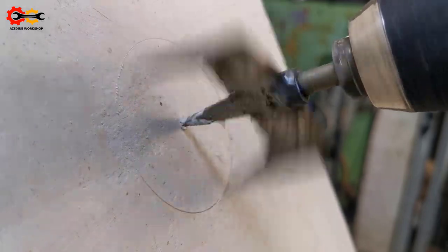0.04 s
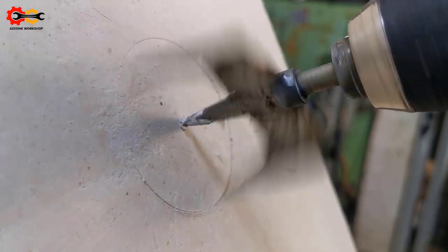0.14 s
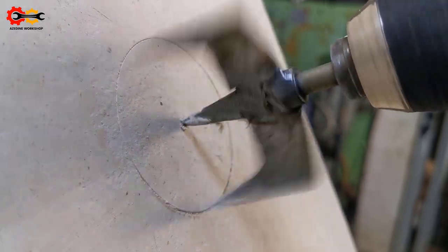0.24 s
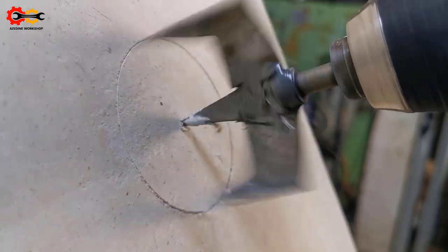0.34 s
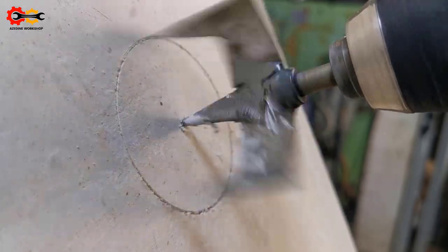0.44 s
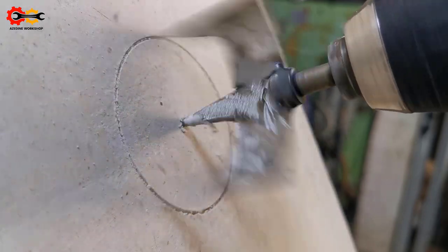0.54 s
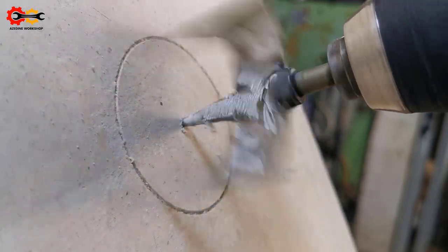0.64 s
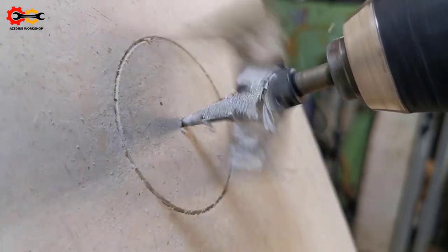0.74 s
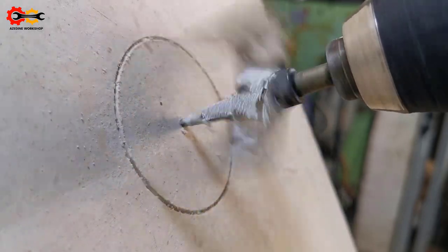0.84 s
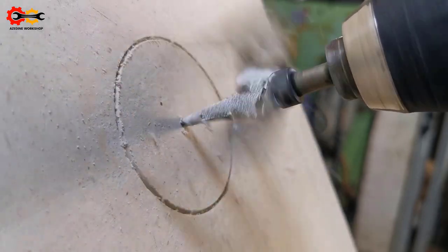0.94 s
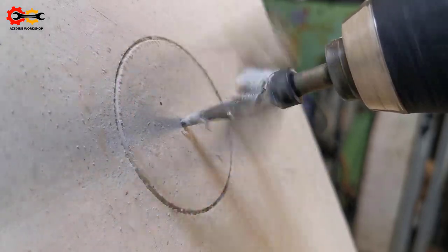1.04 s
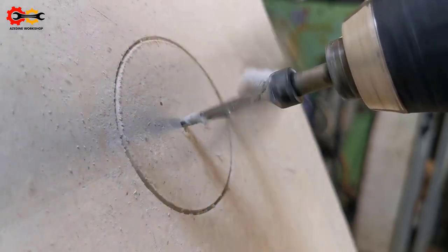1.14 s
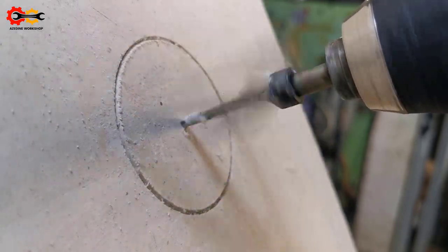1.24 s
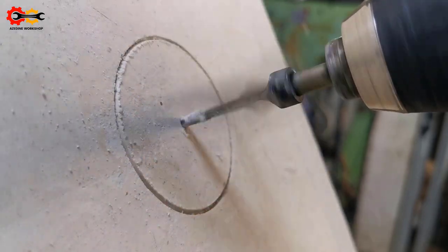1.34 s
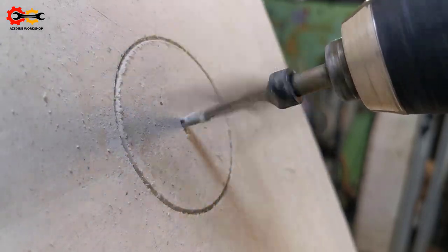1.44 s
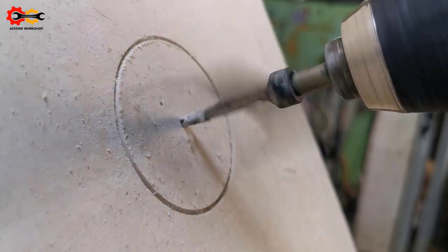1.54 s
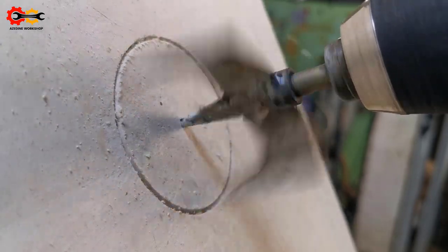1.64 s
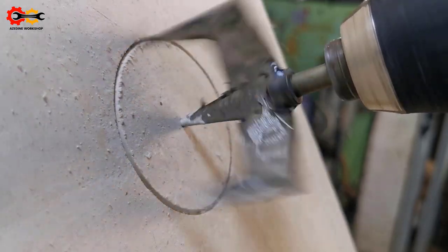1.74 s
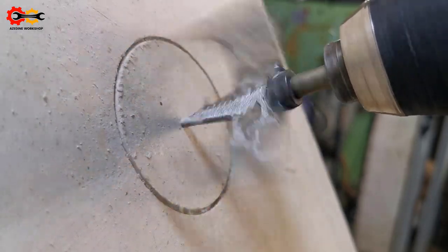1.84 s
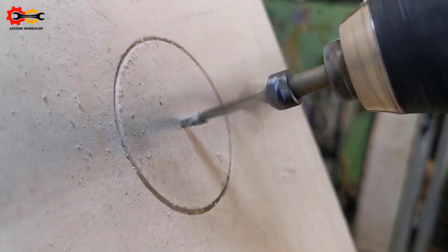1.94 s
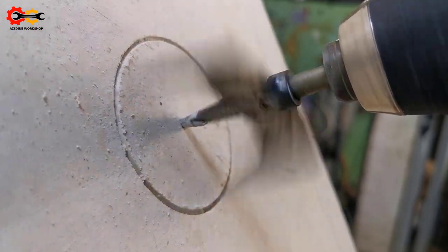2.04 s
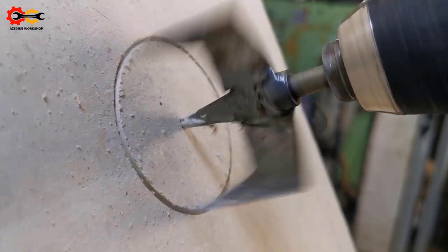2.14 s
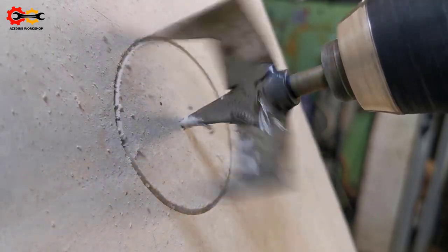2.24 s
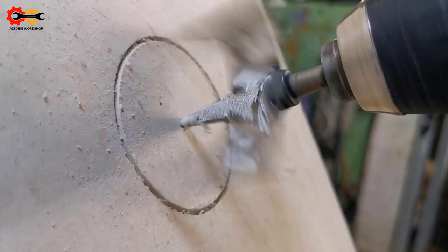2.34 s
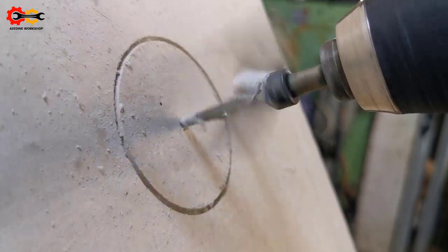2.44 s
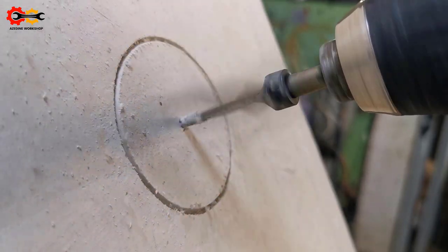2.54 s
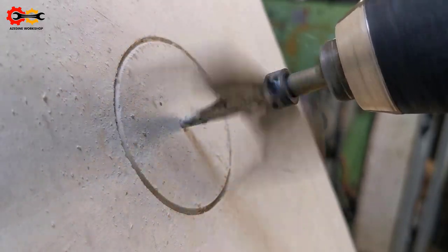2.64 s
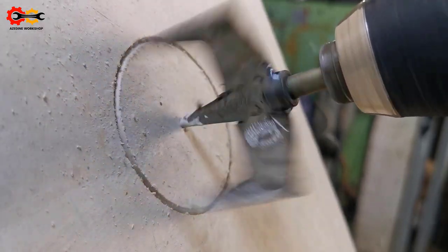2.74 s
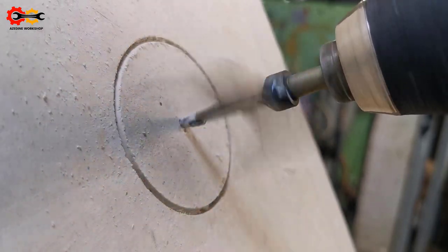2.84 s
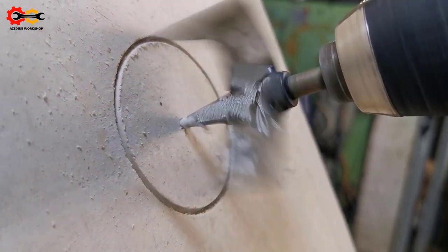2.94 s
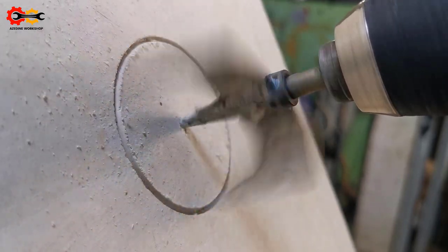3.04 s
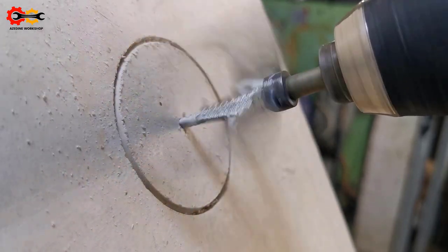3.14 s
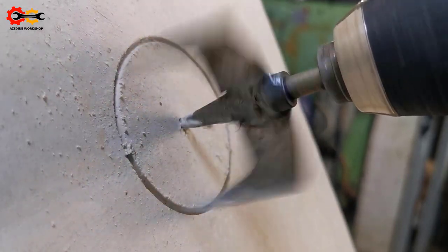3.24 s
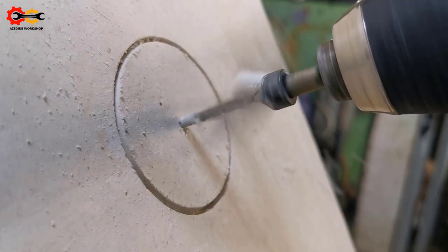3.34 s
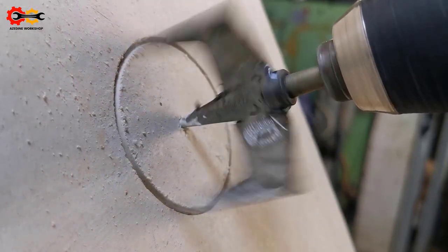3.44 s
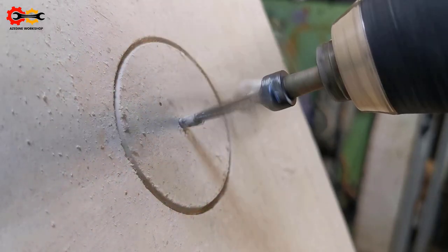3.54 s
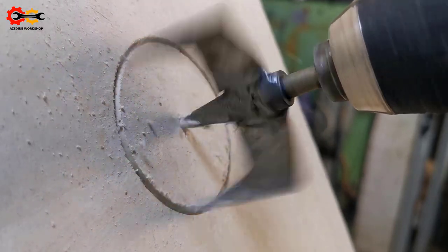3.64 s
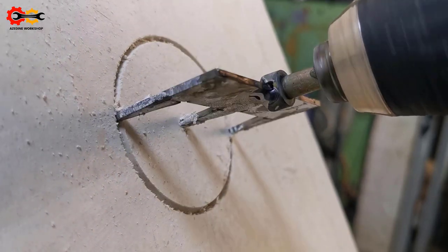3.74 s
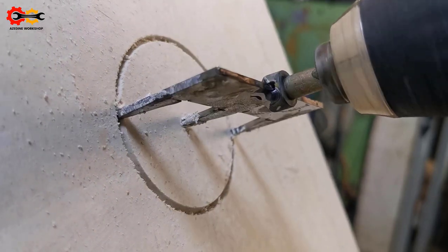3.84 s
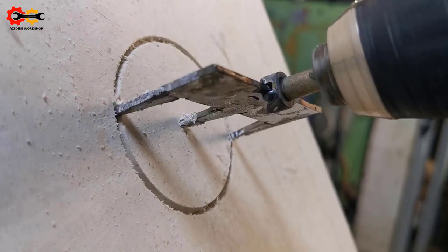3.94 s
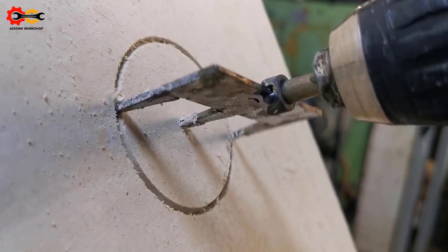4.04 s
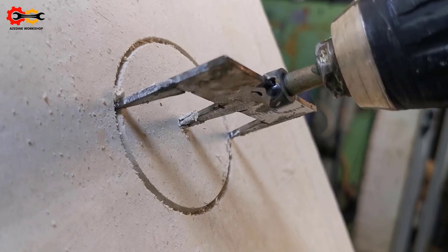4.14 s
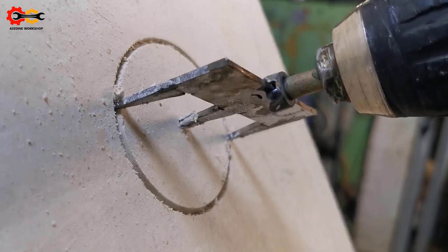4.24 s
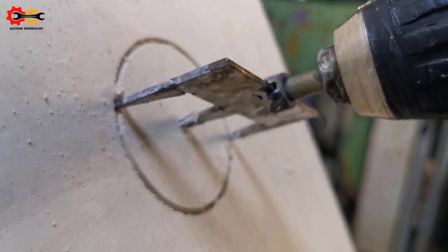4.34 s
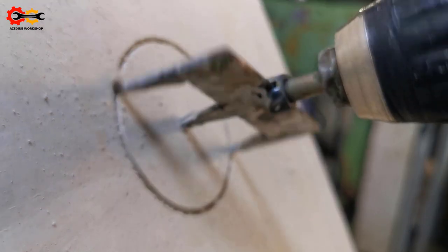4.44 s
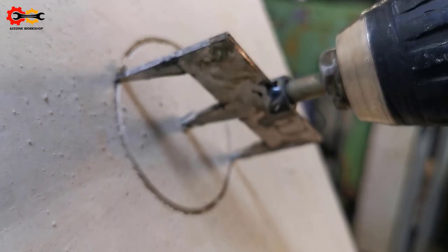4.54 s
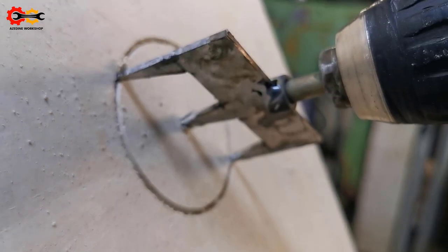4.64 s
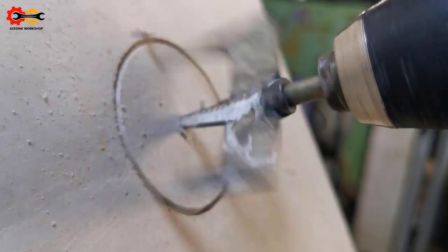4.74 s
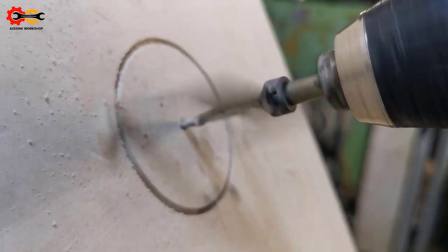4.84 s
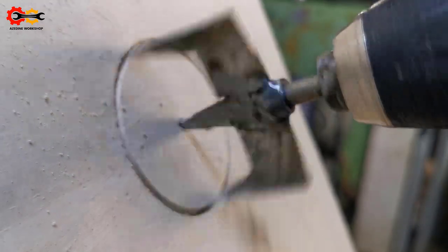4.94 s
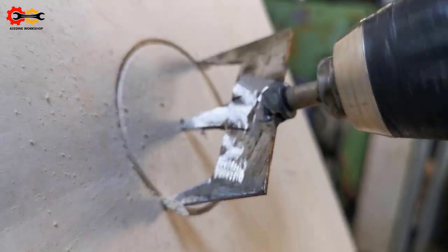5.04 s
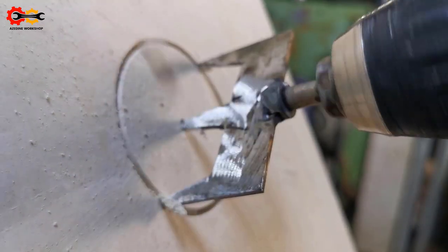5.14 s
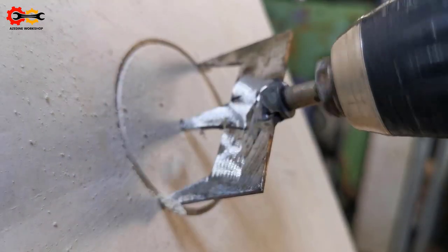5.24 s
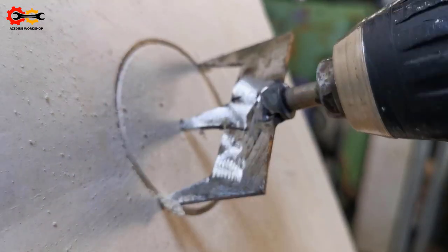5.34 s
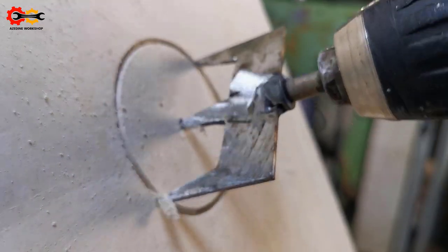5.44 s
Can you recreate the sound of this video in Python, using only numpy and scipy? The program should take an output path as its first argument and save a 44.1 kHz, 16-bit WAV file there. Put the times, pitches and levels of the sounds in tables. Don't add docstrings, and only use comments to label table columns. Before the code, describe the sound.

Close and dry, mostly on the right: a drill's gears whine, rising in steps, while metal prongs tear wood in a gritty pulsing rasp. A fixed high motor tone sings throughout. Near four seconds the pitch falls and a very high squeal breaks out. Clicks and a short near-quiet follow, then a hard click, a motor hum, another burst of grinding and a weaker squeal as the drill bogs down. Faint low workshop rumble lies underneath.

```python
import sys
import numpy as np
from scipy import signal
from scipy.fft import rfft, irfft, next_fast_len
from scipy.io import wavfile
from scipy.ndimage import uniform_filter1d

SR = 44100
rng = np.random.default_rng(int(sys.argv[2]) if len(sys.argv) > 2 else 0)


def boost_factor(decibels):
    exponent = np.asarray(decibels, float) / 20
    return 10 ** exponent


def log_audio(samples):
    frames = np.atleast_2d(samples).T
    limited = np.clip(frames, -1, 1)
    pcm = np.round(limited * 32767).astype(np.int16)
    wavfile.write(sys.argv[1], SR, pcm)


N = 242550
SIZE = next_fast_len(N + SR)
HZ = np.maximum(np.arange(SIZE // 2 + 1) * SR / SIZE, 1)
TIME = np.arange(N) / SR
LEFT_LAG = 17
FULL_SAG_HZ = 30


def in_time(tables):
    s, *columns = np.concatenate([np.array(rows, float) for rows in tables]).T
    s = s + 1e-6 * np.arange(len(s))
    return [np.interp(TIME, s, c) for c in columns]


def sounding(spans):
    inside = sum((TIME >= a) & (TIME <= b) for a, b in spans) * 1.
    return uniform_filter1d(inside, size=300)


def at_hz(points, hz):
    point_hz, point_db = np.array(points).T[:2]
    return np.interp(np.log(hz), np.log(point_hz), point_db)


def rms_one(x):
    return x / np.sqrt(np.mean(x ** 2) + 1e-20)


def drift(rate):
    r = np.exp(-80 * np.pi * rate / SR)
    slow = signal.lfilter([1], [1, -2 * r, r * r], rng.standard_normal(N // 40 + 2002))[2000:]
    return np.interp(np.arange(N) / 40, np.arange(len(slow)), rms_one(slow))


def coloured(spectrum):
    bins = rfft(rng.standard_normal(SIZE)) * boost_factor(at_hz(spectrum, HZ))
    return rms_one(irfft(bins)[:N])


def ring(blows, hz, t60):
    r, w = boost_factor(-60 / (t60 * SR)), 2 * np.pi * hz / SR
    return signal.lfilter([0, np.sin(w)], [1, -2 * r * np.cos(w), r * r], blows + 1e-18)


def chuck():
    # time in seconds, rate at which gear teeth meet in Hz, sag once a chuck turn in Hz.
    speed = [(0, 1303, 5), (.068, 1283, 0), (.12, 1156, 0), (.189, 1125, 10), (.26, 1440, 15),
             (.42, 1491, 3), (.87, 1424, 3), (1.67, 1432, 24), (1.784, 1575, 40), (2.17, 1551, 34),
             (2.79, 1486, 33), (2.966, 1829, 28), (3.74, 1758, 24), (3.826, 1625, 0), (3.897, 1216, 0),
             (4.121, 1186, 0), (4.143, 1420, 0), (4.17, 1231, 0)]
    restart = [
        (5.06, 1780, 0),
        (5.078, 1750, 0),
        (5.172, 1215, 0),
    ]
    meshes_per_turn, start_rad = 281.5, 2.84
    mean_hz, sag_hz = in_time([speed, restart])
    return mean_hz, sag_hz, start_rad + 2 * np.pi * np.cumsum(mean_hz) / SR / meshes_per_turn


def cutting():
    # time in seconds, level in dB.
    bite = [(0, -33.5), (.045, -40), (.094, -33), (.17, -35.5), (.23, -33), (.6, -32), (1.3, -32),
            (1.6, -30.5), (2.0, -32), (2.4, -31), (2.8, -32.5), (3.2, -29.5), (3.5, -30.5), (3.82, -29),
            (3.9, -33), (3.986, -40), (4.164, -40.5), (4.204, -54.5)]
    # time in seconds, level in dB.
    coast = [
        (4.22, -59),
        (4.256, -86),
        (4.278, -41),
        (4.29, -57.5),
        (4.42, -92),
    ]
    # time in seconds, level in dB.
    bite_again = [(4.824, -68), (4.856, -43.5), (4.96, -31.5), (5.0, -36.5), (5.036, -35), (5.23, -38.5),
                  (5.252, -36), (5.286, -45.5), (5.47, -41), (5.5, -51)]
    # start in seconds, then bench, board and gearbox in dB relative to the prongs.
    stages = [
        (0, -13.5, -14.5, -4),
        (1.15, -13, -14.5, -4.5),
        (3.9, -21.5, -15, -2.5),
        (4.2, -6, -7.5, -11),
        (4.6, -7.5, -6.5, -4),
        (5.2, -14, -4.5, -4),
    ]
    # throb once a turn in dB, throb twice a turn in dB.
    throb = [
        (.8, 1.5),
        (.8, 1.4),
        (.8, 0.6),
        (.9, -0.05),
    ]
    once_lag, twice_lag = 0.15, -0.3
    (bite_db,), (_, sag_hz, angle) = in_time([bite, coast, bite_again]), chuck()
    stages = np.array(stages)
    now = np.searchsorted(stages[:, 0], TIME, "right") - 1
    _, bench, board, gearbox = stages[now].T
    shares_db = uniform_filter1d(np.array([bench, board, 0 * TIME, gearbox]), size=1500)
    throb_db = np.array(throb) @ [np.cos(angle + once_lag), np.cos(2 * angle + twice_lag)]
    return bite_db + shares_db + throb_db * sag_hz / FULL_SAG_HZ


def whine():
    # multiple of the motor speed, level in dB relative to the whine, unsteadiness in dB.
    lines_of_motor = [
        (2.78, -26, 2.0),
        (8.35, -21, 3.0),
        (9.0, 0.1, 1.5),
        (18.0, -18, 3.5),
        (27.0, -24, 3.0),
    ]
    # gear mesh rate in Hz, level in dB.
    whine_law = [(1125, -54), (1200, -37.5), (1300, -39), (1430, -32.5), (1560, -31.5), (1800, -27.5)]
    pinion_teeth = 9
    second_prong, prong_lag = .52, 1.96
    (mean_hz, sag_hz, angle), bite_db = chuck(), cutting()[2]
    again, usual = TIME > 5, bite_db - np.median(bite_db)

    mesh_hz = mean_hz + sag_hz * (np.cos(angle) + second_prong * np.cos(2 * angle + prong_lag))
    tremble_hz = np.where(again, 30, 4 + .12 * sag_hz) * (drift(30) + drift(70))
    turn = 2 * np.pi * np.cumsum(mesh_hz + tremble_hz) / pinion_teeth / SR

    level_db = np.where(again, -41.5 + 2.6 * drift(30.0), at_hz(whine_law, mean_hz) + 0.3 * usual)
    lines = sum(boost_factor(db + waver_db * drift(15.0)) * np.sin(k * turn) for k, db, waver_db in lines_of_motor)

    octaves_off = abs(np.log2(mean_hz / 1600.0))
    bars_db = -42 + 0.94 * usual - 8 * octaves_off - 9 * (TIME > 3.88)
    bars_db = np.where(again, -50, bars_db) + 7 + 3.5 * drift(25.0)
    bars = boost_factor(bars_db) * np.sin(5 * turn)
    return (lines * boost_factor(level_db + 8.5) + bars) * sounding([(0, 4.165), (5.065, 5.165)])


def grind(grain_db, patchy_db, together_db):
    grind_bands_hz = [
        230,
        500,
        3000,
        7500,
    ]
    # frequency in Hz, level in dB.
    grind_colour = [(100, -24), (220, -16), (850, -6), (1260, -7), (2400, -2), (4400, -9), (6000, -14.5),
                    (8000, -19), (10000, -17), (13000, -17.5), (14000, -23), (16000, -17.5)]
    # frequency in Hz, width in Hz, height in dB.
    body = [(157.3, 58, 5.5), (475, 200, 2.5), (2340, 39, 4.5), (2480, 37, 4), (2995, 28, -4),
            (3087, 80, 4), (5140, 780, 7.5), (6630, 630, 7.5), (8970, 1150, 4), (10580, 50, 5),
            (10920, 920, 7), (11800, 840, 5.5), (13160, 400, 8), (14600, 600, 4.5)]
    # frequency in Hz, left minus right in dB.
    shadow = [(129, 4), (689, -9.5), (1248, -5), (1593, -15.5), (2885, -7.5), (5167, -6.5), (5986, -6),
              (7622, -1.2), (9603, -3), (10594, -20), (11498, -10.5), (12101, -14.7), (14125, -7),
              (15460, -10)]
    # frequency in Hz, share that the two microphones have in common (0 to 1).
    likeness = [(150, 0.97), (400, 0.55), (1000, 0.48), (3000, 0.13), (6000, 0.28), (12000, 0.15)]

    tears = (rng.random(SIZE) < 2500 / SR) * boost_factor(grain_db * np.minimum(rng.exponential(1, SIZE), 4))
    rough = np.sqrt(1 + uniform_filter1d(tears, size=24) * 1.4)
    peaks_db = sum(db / (1 + (2 * (HZ - hz) / width) ** 2) for hz, width, db in body)
    shape = boost_factor(at_hz(grind_colour, HZ) + peaks_db)
    near, apart = rfft(rng.standard_normal((2, SIZE)) * rough) * shape

    late = np.exp(-2j * np.pi * HZ * LEFT_LAG / SR)
    alike = np.clip(at_hz(likeness, HZ), 0, 1)
    far = boost_factor(at_hz(shadow, HZ)) * (alike * near * late + np.sqrt(1 - alike ** 2) * apart)

    levels_db, together = cutting()[:, ::64], drift(42.0)
    steady_db = np.median(levels_db, axis=1, keepdims=True)
    prong_power = 2 * np.sum(abs(near[(HZ > 2000) & (HZ < 4500)]) ** 2)
    scale = boost_factor(steady_db[2]) / np.sqrt(prong_power) * SIZE

    edges = np.r_[np.geomspace(110, 1800, 11), np.geomspace(2100, 11600, 13), 13250, 16500]
    out = 0
    for low, high in zip(edges, edges[1:]):
        hz, inside = np.sqrt(low * high), (HZ >= low) & (HZ < high)
        weights = [np.interp(np.log(hz), np.log(grind_bands_hz), row) for row in np.eye(4)]
        level_db = np.repeat(weights @ (levels_db - steady_db), 64)[:N]
        flicker_db = patchy_db * drift(15.5) + together_db * together
        both = irfft(np.array([far, near]) * inside)[:, :N]
        out = out + boost_factor(level_db + flicker_db) * both
    return out * scale * boost_factor(5.0) * sounding([(0, 4.4), (4.815, 5.6)])


def rasp():
    # frequency in Hz, level in dB, time to die by 60 dB in seconds.
    prong_modes = [(594, -5, 0.037), (2298, -0.5, 0.032), (2508, -1, 0.078), (3010, -3, 0.052),
                   (3046, -1.5, 0.028), (3410, -4.5, 0.065)]
    chance = 260 * boost_factor(4.0 * drift(12.0)) / SR
    strength = boost_factor(3.7 * np.minimum(rng.exponential(1, N), 2.5))
    snaps = (rng.random(N) < chance) * strength
    dealt = rng.integers(0, len(prong_modes), N)
    rings = sum(boost_factor(db) * ring(snaps * (dealt == k), hz, t60) for k, (hz, db, t60) in enumerate(prong_modes))
    return rms_one(rings) * boost_factor(cutting()[2] - 7.0)


def chopper():
    # time in seconds, level of the tone in dB.
    chopper_levels = [
        [(0, -52), (.34, -42), (2.7, -40), (3.05, -38), (3.84, -38.5), (4.15, -49)],
        [(4.59, -45), (4.88, -40), (4.92, -36), (5.25, -37), (5.3, -44.5), (5.4, -38.5), (5.5, -41.5)],
    ]
    # time in seconds, level of the overtones in dB.
    overtone = [(0, -64), (4.2, -68), (4.6, -67), (4.65, -51.5), (4.85, -56), (4.95, -62), (5.5, -52.5)]
    (tone_db,), (overtone_db,) = in_time(chopper_levels), in_time([overtone])
    phase = 2 * np.pi * 4883.6 * TIME

    overtone_db = overtone_db + 2.5 * drift(12) * (TIME > 4.85)
    overtones = boost_factor(overtone_db) * (np.sin(2 * phase) + boost_factor(-7.0) * np.sin(3 * phase))
    side = boost_factor(-53 + 1.5 * drift(20.0)) * np.sin(2 * np.pi * 5410 * TIME)
    side = side * sounding([(4.83, 4.895), (5.19, 5.25), (5.32, 5.42)])

    _, sag_hz, angle = chuck()
    tone_db = tone_db + 0.5 * np.cos(angle + 1) * sag_hz / FULL_SAG_HZ
    tone = boost_factor(tone_db + 1.9 * drift(20.0)) * np.sin(phase)
    return (tone + overtones + side) * boost_factor(12.0) * sounding([(0, 4.165), (4.593, 5.485)])


def workshop():
    # time in seconds, level of the rumble in dB.
    rumble_levels = [(0, -54.5), (1.4, -57.5), (2.7, -64), (3.2, -53), (3.9, -63.5), (4.4, -54.5),
                     (5.08, -51), (5.5, -69)]
    # frequency in Hz, level in dB per Hz.
    rumble_colour = [(15, -33), (25, -4), (113, -9), (133, -6.5), (162, -15.5), (317, -22), (400, -25),
                     (520, -64), (880, -120)]
    # frequency in Hz, level in dB per Hz.
    hush_colour = [(180, -25), (300, -7), (1470, -19), (2320, -17.5), (5000, -28.5), (8000, -28),
                   (10600, -27), (12000, -41)]
    level_db, = in_time([rumble_levels])
    own = np.array([coloured(rumble_colour), coloured(rumble_colour)])
    rumble = coloured(rumble_colour) + 0.58 * own
    hush = np.array([coloured(hush_colour) * boost_factor(-4.5), coloured(hush_colour)])
    return rumble * boost_factor(level_db + 1.4 * drift(3.0)) + hush * boost_factor(-65.5 + 4.0)


def squeal():
    # time in seconds, pitch in Hz, level in dB, left minus right in dB.
    squeal_path = [
        [(3.926, 12560, -33, -10), (3.94, 12480, -10.5, -10), (3.97, 12330, -35.5, 18), (4.008, 12500, -18, -4),
         (4.068, 12440, -12.5, -6), (4.105, 12440, -14.5, -7), (4.148, 12526, -8, -12),
         (4.181, 12290, -16.5, -9), (4.193, 12090, -34, -15)],
        [(5.256, 12400, -40, 4), (5.264, 12440, -24.5, 4.5), (5.316, 12350, -30, -1), (5.4, 12260, -36, 0),
         (5.418, 12284, -26.5, 6), (5.453, 12290, -20, -3), (5.46, 12520, -16, -3), (5.479, 12400, -22, 0),
         (5.5, 12360, -34, -13)],
    ]
    hz, level_db, left_db = in_time(squeal_path)
    second = TIME > 5
    tremble_hz = np.where(second, 25.0, 12.0) * drift(54.0)
    phase = 2 * np.pi * np.cumsum(hz + tremble_hz) / SR
    beat = 1 + 0.026 * np.sin(2 * np.pi * 1195 * TIME)
    tone = boost_factor(level_db + 3 + .7 * drift(40)) * beat * sounding([(3.924, 4.197), (5.252, 5.6)])
    shift = np.where(second, -2.5 + .5 * drift(14.0), .9)
    return tone * np.sin(phase), tone * np.sin(phase + shift) * boost_factor(left_db)


def crack(rows, t60, low_hz, high_hz):
    blows = np.zeros(N)
    blows[(rows[:, 0] * SR).astype(int) + 50] = boost_factor(rows[:, 1])
    fade = boost_factor(-60 * np.arange(1500) / SR / t60)
    burst = np.convolve(blows, fade)[:N] * rng.standard_normal(N)
    return signal.sosfilt(signal.butter(1, [low_hz, high_hz], "band", fs=SR, output="sos"), burst)


def clicks():
    # time in seconds, peak in dB, brightness in dB.
    click_rows = [(4.234, -34, -5), (4.24, -38, -2), (4.267, -38, -15), (4.276, -29, -14.5),
                  (4.276, -25, -6), (4.283, -47, -11), (4.323, -33, -7.5), (4.353, -51, -17),
                  (4.524, -48, -17), (4.592, -19, -8), (4.596, -16, -12), (4.596, -8, -6), (4.6, -15, -27),
                  (4.604, -23, -24), (4.609, -19.5, -23), (4.624, -25, -17)]
    # frequency in Hz, level in dB, time to die by 60 dB in seconds.
    casing = [(157, -6, 0.14), (404, -14, 0.059), (585, -2, 0.055), (790, -8, 0.03), (1860, -4, 0.027),
              (2660, -5, 0.023), (3980, -4, 0.02), (5140, -3, 0.021), (10500, -7, 0.01)]
    # time in seconds,
    # peak in dB.
    ticks = [
        (4.275, -36.5),
        (4.322, -43),
        (4.859, -28),
        (4.878, -30),
        (4.959, -30),
    ]
    rows, out = np.array(click_rows), np.zeros(N)
    at = (rows[:, 0] * SR).astype(int)
    spread = rng.normal(0, 1.8, (len(at), len(casing)))
    for k, (hz, db, t60) in enumerate(casing):
        blows = np.zeros(N)
        late = int(SR * (.001 + 2.5 / hz))
        bright_db = (hz > 6000) * (rows[:, 2] + 17.0)
        blows[at + late] = boost_factor(rows[:, 1] + db - 11.0 + spread[:, k] + bright_db)
        out += ring(blows, hz, t60)
    cracks = boost_factor(-0.5) * crack(rows, 0.021, 500, 3500)
    return out + cracks + boost_factor(11.0) * crack(np.array(ticks), 0.014, 8000, 15000)


def pair(x, left_db):
    return np.array([np.roll(x, LEFT_LAG) * boost_factor(left_db), x])


def room(x):
    t60, level_db = 0.24, -25
    t = np.arange(SR // 2) / SR
    echoes = rng.standard_normal((2, len(t))) * boost_factor(-60 * t / t60) * (t > .006)
    echoes /= np.sqrt(np.sum(echoes ** 2, axis=1, keepdims=True))
    return boost_factor(level_db) * signal.fftconvolve(x[None], echoes, axes=1)[:, :N]


def scene():
    gears, tone, taps, (right, left) = whine(), chopper(), clicks(), squeal()
    direct = pair(gears, -21.0) + pair(tone, -20.5) + pair(taps, -13.5) + np.array([left, right])
    wet = room(gears + boost_factor(-31.0) * tone + boost_factor(1.5) * taps + boost_factor(5.0) * right)
    wood = grind(grain_db=5.0, patchy_db=0.8, together_db=0.77) + pair(rasp(), -6.0)
    return direct + wet + wood + workshop()


def low_pass(x):
    return signal.sosfilt(signal.butter(12, 16890, fs=SR, output="sos"), x)


def record(dry):
    # time in seconds, depth in dB, recovery in seconds.
    ducks = [(1.05, 2.5, 0.11), (1.91, 1, 0.15), (2.095, 0.5, 0.083), (2.27, 1, 0.088), (2.462, 4, 0.1),
             (2.643, 5, 0.074), (3.31, 2.5, 0.12), (3.46, 1.5, 0.21), (3.879, 1, 0.16)]
    # start in seconds, end in seconds.
    starved = [
        (3.955, 4.585),
        (5.245, 5.6),
    ]
    cutoff_hz, starved_hz, edge_hz = 15720, 13300, 130
    duck_db = sum(-db * np.clip(1 - (TIME - s) / back_s, 0, 1) * (TIME >= s) for s, db, back_s in ducks)
    ducked = dry * boost_factor(uniform_filter1d(duck_db, size=200))
    bins = rfft(ducked, SIZE) * np.clip((cutoff_hz - HZ) / edge_hz, 0, 1)
    top = irfft(bins * np.clip((HZ - starved_hz) / edge_hz / 2, 0, 1))[:, :N]
    mix = irfft(bins)[:, :N] - top * sounding(starved)
    return low_pass(mix)


dry = scene()
out = record(dry)
log_audio(out)
```